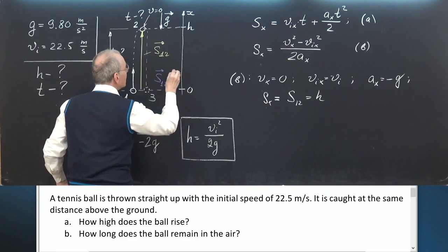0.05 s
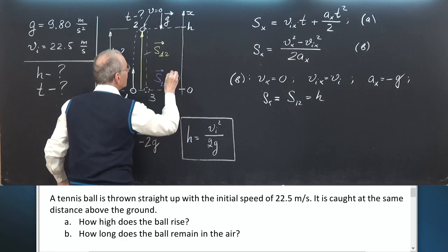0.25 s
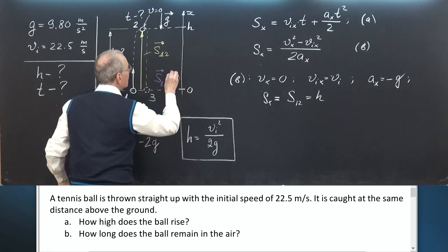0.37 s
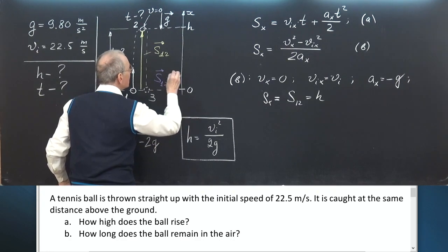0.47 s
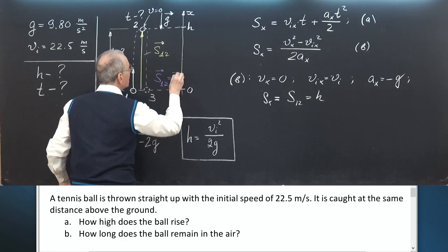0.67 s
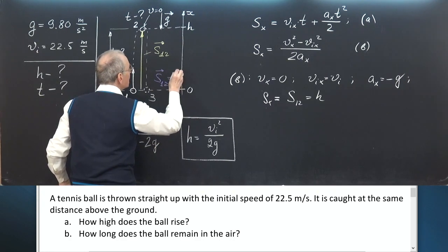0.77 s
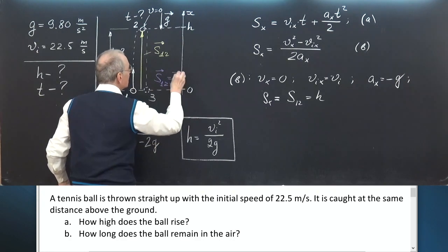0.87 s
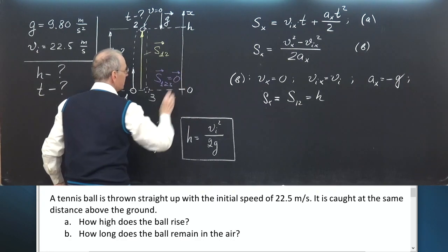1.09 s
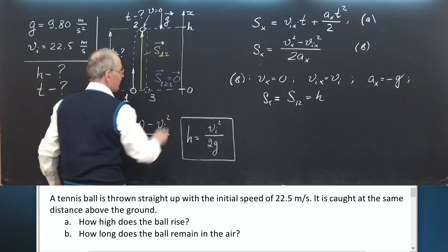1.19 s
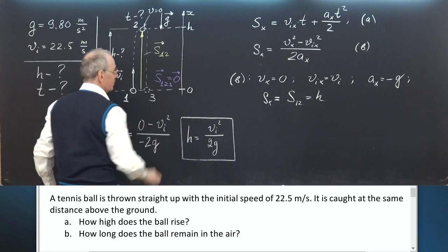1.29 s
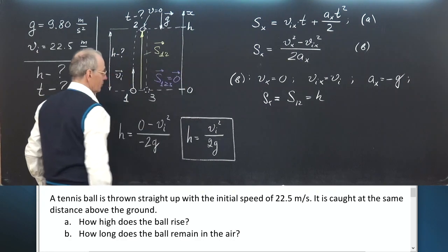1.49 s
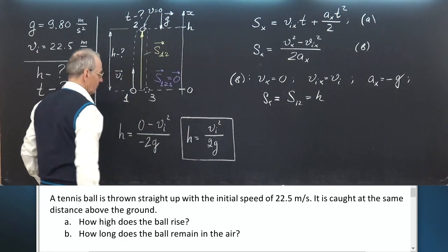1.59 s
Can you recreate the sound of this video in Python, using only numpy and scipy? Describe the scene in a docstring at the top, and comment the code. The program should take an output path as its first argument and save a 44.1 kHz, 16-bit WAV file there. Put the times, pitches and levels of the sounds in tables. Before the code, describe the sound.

Chalk lands on a blackboard with one sharp, woody tap, then faint scratchy strokes and a much weaker tap; clothing rustles and a shoe knocks softly and scuffs in a quiet, slightly reverberant classroom with low ventilation.

```python
"""Chalk on a wall-mounted blackboard in a quiet classroom: one sharp tap and a much fainter one, as
short pushes ring the modes of the panel beside a noisy click; faint strokes are stick-slip grains that
hiss at the tip and rumble in the panel. The writer lowers his arm with a rustle, steps back and scuffs
a shoe: filtered friction grains, a soft swish of noise and a knock on floor modes. Ventilation
(coloured noise) and a thin electrical whine (a sine) lie underneath."""
import sys
import numpy as np
from scipy import signal
from scipy.fft import rfft, irfft
from scipy.io import wavfile

SR = 44100
rng = np.random.default_rng(int(sys.argv[2]) if len(sys.argv) > 2 else 0)


def unload_audio(sound):
    """Save the sound as a 16-bit wav file, at the path given as the first command line argument."""
    columns = np.transpose(np.atleast_2d(sound))
    # keep every value between -1 and 1, then stretch to whole-number steps
    steps = np.round(np.clip(columns, -1, 1) * 32767)
    wavfile.write(sys.argv[1], SR, steps.astype(np.int16))


N = 72765  # length/samples

# Modes of the blackboard panel: f/Hz, level/dB, t60/s
BOARD_MODES = [(99.2, -20, 0.39), (198.4, 1.5, 0.063), (208, -9, 0.027), (240, -14, .09),
               (360.3, -12, 0.098), (446, -17, 0.045), (623, -24, 0.088), (811, -4.5, 0.02),
               (1045, -3, 0.015), (1293, -22, 0.052), (1491, -16, 0.052), (1500, -35, 0.045),
               (1766, -31, 0.11)]


def undb(db):
    """Amplitude ratio from a level: 20 dB for each factor of ten."""
    return 10 ** (np.asarray(db) / 20)


def unit(x):
    """Normalisation to a root-mean-square amplitude of 1."""
    return x / np.sqrt(np.mean(x ** 2))


def seconds():
    """Sampled time: one instant every 1/SR seconds."""
    return np.arange(N) / SR


def through(x, response):
    """Linear filtering: convolution with an impulse response."""
    return signal.fftconvolve(x, response)[:N]


def colour(points, size=4096):
    """Minimum-phase filter of unit energy: folding the cepstrum of a (f/Hz, level/dB) curve makes it causal."""
    hz, db = np.array(points).T
    f = np.maximum(np.arange(size // 2 + 1) * SR / size, 1)
    level_db = np.interp(np.log(f), np.log(hz), db)
    cepstrum = irfft(np.log(undb(level_db)))
    # Fold negative times onto positive ones
    cepstrum[1:size // 2] *= 2
    cepstrum[size // 2 + 1:] = 0
    response = irfft(np.exp(rfft(cepstrum)))
    return response / np.linalg.norm(response)


def fade(t60):
    """Exponential damping: a fall of 60 dB in t60 seconds."""
    return np.exp(-np.log(1000) * seconds() / t60)


def ring(modes, cycles=0.01):
    """Modal superposition: damped sines, each building up with a time constant given in cycles."""
    t = seconds()
    total = 0
    for hz, db, t60 in modes:
        build_up = 1 - np.exp(-t * hz / cycles)
        total = total + undb(db) * build_up * fade(t60) * np.sin(2 * np.pi * hz * t)
    return total


def at(x, start):
    """Pure delay: silence up to the start time, then the sound."""
    return np.concatenate([np.zeros(max(int(start * SR), 0)), x])[:N]


def swell(start, length, attack, release):
    """Amplitude envelope of a movement: linear rise, hold, linear fall."""
    t = seconds() - start
    return np.clip(np.minimum(t / attack, (length - t) / release), 0, 1)


def slips(rate, spread_db):
    """Stick-slip friction: clicks at random instants, of random sign and uneven size."""
    chance = rng.random(N)
    size = np.minimum(rng.exponential(size=N), 4)
    sign = rng.choice([-1, 1], N)
    return unit((chance < rate / SR) * undb(spread_db * size) * sign)


def blow(response, contact_s):
    """Impulsive excitation: a smooth push, duller the longer the contact lasts."""
    phase = np.minimum(seconds() / contact_s, 1)
    push = np.sin(np.pi * phase) ** 2
    return -through(response, push / push.sum())


def background():
    """Steady sources: broadband ventilation noise and a pure-tone electrical whine."""
    # Ventilation spectrum: f/Hz, density level/dB per Hz
    air_spectrum = [(20, -37), (45, -2.5), (100, -4.5), (190, -0.5), (300, -3), (700, -11), (1500, -15.5),
                    (3000, -21.5), (7000, -30), (15500, -33)]
    air_db, whine_db, whine_hz = -58, -86, 13754  # rms levels before the microphone
    air = unit(through(rng.standard_normal(N), colour(air_spectrum)))
    whine = unit(np.sin(2 * np.pi * whine_hz * seconds()))
    return undb(air_db) * air + undb(whine_db) * whine


def writer():
    """Friction of sleeve and shoe as filtered grains, and of the shirt as a smooth swish of noise."""
    # Rubbing of sleeve and shoe: start t/s, length t/s, attack t/s, release t/s, level/dB
    rubbings = [(0.141, 0.044, 0.0078, 0.027, -57.5), (1.092, 0.48, 0.074, 0.014, -63),
                (1.381, .15, 0.067, 0.053, -60), (1.491, 0.14, 0.086, 0.041, -48.5),
                (1.608, 0.091, 0.037, .03, -51.5)]
    # Colour of the rubbing: f/Hz, level/dB
    rub_spectrum = [(70, -16.5), (200, -0.5), (330, -8.5), (600, 0.5), (1200, -9), (2000, -14),
                    (3500, -23.5), (7000, -32.5), (15000, -50)]
    # Swish of the shirt as the arm moves: t/s, level/dB
    swish_course = [(.2, -73), (.9, -69), (1.05, -70), (1.198, -64.5), (1.3, -68.5), (1.42, -68),
                    (1.65, -68)]
    # Colour of the swish: f/Hz, level/dB
    swish_spectrum = [(300, -9), (1200, -1), (2800, -2.5), (4500, -3.5), (9000, -9), (15000, -19)]
    grains = slips(rate=2600, spread_db=3)  # mean rate per second
    rub = unit(through(grains, colour(rub_spectrum)))
    effort = 0
    for start, length, attack, release, db in rubbings:
        effort = effort + undb(db) * swell(start, length, attack, release)
    swish = unit(through(rng.standard_normal(N), colour(swish_spectrum)))
    times, levels_db = np.array(swish_course).T
    return effort * rub + undb(np.interp(seconds(), times, levels_db)) * swish


def strokes():
    """Stick-slip excitation: one train of slips drives panel and stick, and adds grain to the tip's hiss."""
    # Strokes: start t/s, length t/s, attack t/s, release t/s, panel level/dB, tip level/dB, tip tilt/(dB/octave)
    stroke_list = [(0.236, 0.31, 0.0074, 0.22, -59, -65.5, 1), (0.43, 0.14, 0.088, 0.039, -50.5, -55.5, .5),
                   (0.586, 0.072, 0.0089, 0.0097, -54, -66, 0.7),
                   (0.703, 0.0817, 0.019, 0.0055, -49, -65.5, 0), (0.803, 0.043, .005, .03, -54, -70, 0.5),
                   (0.823, 0.078, 0.027, 0.0092, -55.5, -66.5, 1.3)]
    # Colour of the hiss at the chalk tip: f/Hz, level/dB
    tip_spectrum = [(500, -8.5), (1600, 11.5), (3100, -1), (4500, 8.5), (6200, 0.5), (9000, 1.5),
                    (13000, -5.5), (16000, -12)]
    # Colour of the panel's dense upper modes: f/Hz, level/dB
    panel_spectrum = [(90, -28.5), (150, -33), (215, 9), (295, 3.5), (370, 7.5), (480, 3), (750, -3.5),
                      (1100, -13), (1700, -14.5), (2800, -17.5), (8000, -31.5)]
    # Resonances of the held stick: f/Hz, level/dB, t60/s
    stick_modes = [(1693, 8, 0.052), (2410, -12, 0.074)]
    modes_db, stick_db = -5, -21.5  # relative to the dense modes
    tip_grain = 0.4  # coarse grains beside the smooth hiss of the powder
    grains = slips(rate=2500, spread_db=3.5)  # mean rate per second
    dense = unit(through(grains, colour(panel_spectrum)))
    modal = unit(through(grains, ring(BOARD_MODES)))
    stick = unit(through(grains, ring(stick_modes)))
    panel = unit(dense + undb(modes_db) * modal + undb(stick_db) * stick)
    powder = tip_grain * grains + rng.standard_normal(N)
    out = 0
    for start, length, attack, release, panel_db, tip_db, tilt_db in stroke_list:
        tilted = [(hz, db + tilt_db * np.log2(hz)) for hz, db in tip_spectrum]
        tip = unit(through(powder, colour(tilted)))
        rubbing = undb(panel_db) * panel + undb(tip_db) * tip
        out = out + swell(start, length, attack, release) * rubbing
    return out


def taps():
    """Impact: a short push excites the panel modes, beside a click with a dense noisy ring."""
    # Landings of the chalk: t/s, panel level/dB, click level/dB
    landings = [(0.2462, -18.5, -19.5), (0.8102, -42, -37)]
    # Colour of the click: f/Hz, level/dB
    click_spectrum = [(60, -35), (150, -17), (400, 5.5), (900, -5.5), (1600, -6), (2300, -16),
                      (4000, -20.5), (7000, -36), (12000, -32), (15500, -44)]
    contact_s, build_cycles = 0.00058, 0.57  # the modes take time to spread over the panel
    click_t60_s, click_ring_db = 0.099, 2  # ring energy relative to the first impulse
    boom = blow(ring(BOARD_MODES, build_cycles), contact_s)
    dense = rng.standard_normal(N) * fade(click_t60_s)
    dense = undb(click_ring_db) * dense / np.linalg.norm(dense)
    response = colour(click_spectrum)
    click = through(signal.unit_impulse(N) + dense, response)
    click = click / np.abs(response).max() / 2  # the first impulse alone peaks at 0.5
    out = 0
    for start, panel_db, click_db in landings:
        out = out + at(undb(panel_db) * boom + undb(click_db) * click, start)
    return out


def steps():
    """Impact of a soft heel: a push excites modes of shoe and floor, beside a dull thump of decaying noise."""
    # Footfalls: t/s, level/dB
    footfalls = [(1.356, -36)]
    # Modes of shoe and floor: f/Hz, level/dB, t60/s
    floor_modes = [(119.8, -21.5, 0.68), (255.4, -13, 0.21), (454, 5, 0.053), (557, -7.5, .08),
                   (743, -5.5, 0.075)]
    # Colour of the shoe's thump: f/Hz, level/dB
    thump_spectrum = [(80, -35), (250, -4.5), (450, -6), (750, 0), (1000, -18.5), (1500, -20),
                      (3000, -37.5), (8000, -48)]
    heel_s, thump_db, thump_t60_s = 0.00097, -5.5, 0.17
    thump = through(rng.standard_normal(N) * fade(thump_t60_s), colour(thump_spectrum))
    knock = blow(ring(floor_modes, cycles=0.16), heel_s) + undb(thump_db) * thump
    return sum(undb(db) * at(knock, start) for start, db in footfalls)


def classroom(x):
    """Diffuse reverberation: convolution with noise whose bands each have their own strength and decay."""
    # Bands of the room's tail: centre f/Hz, level/dB, t60/s
    bands = [(98, -8, 0.4), (230, -7, 0.55), (537, -14.5, 0.22), (1360, -10.5, 0.36), (3400, -9, 0.55),
             (9100, -10.5, 0.55)]
    onset_s = 0.0092
    centres = np.log([row[0] for row in bands])
    f = np.log(np.maximum(np.fft.rfftfreq(N, 1 / SR), 1))
    noise = rfft(rng.standard_normal(N))
    tail = 0
    # The bands overlap as triangles in log frequency
    for share, (hz, db, t60) in zip(np.eye(len(bands)), bands):
        envelope = fade(t60) * np.minimum(seconds() / onset_s, 1)
        band = irfft(noise * np.interp(f, centres, share), N)
        tail = tail + undb(db) * band * envelope / np.linalg.norm(envelope)
    return x + through(x, tail)


def scene():
    """Superposition: writer and chalk excite the room, and the background is added to them."""
    movement = writer() + strokes() + taps() + steps()
    return (classroom(movement) + background())[None]


def record(dry):
    """Band limiting: the microphone thins the deepest bass, and the top is cut steeply."""
    top_hz = 15720
    bass_cut = signal.butter(2, 45, "highpass", fs=SR, output="sos")
    top_cut = signal.ellip(12, 0.1, 70, top_hz, fs=SR, output="sos")  # ripple/dB, stopband/dB
    return signal.sosfilt(top_cut, signal.sosfilt(bass_cut, dry))


dry = scene()
out = record(dry)
unload_audio(out)
```